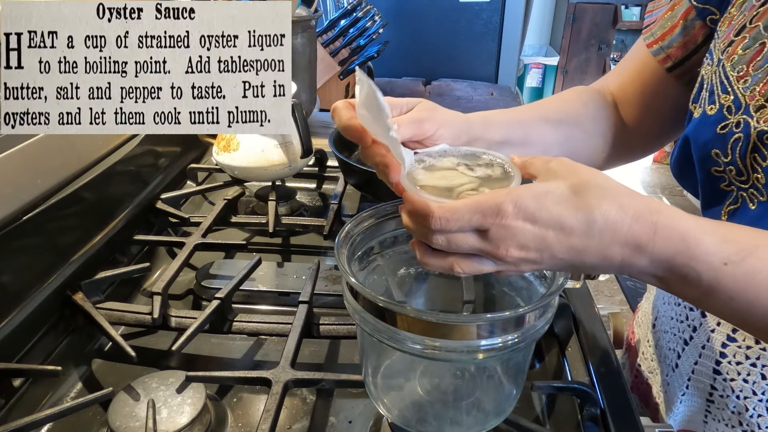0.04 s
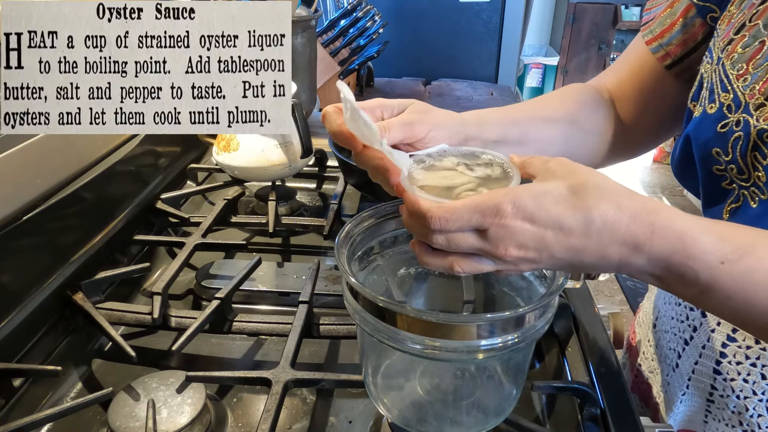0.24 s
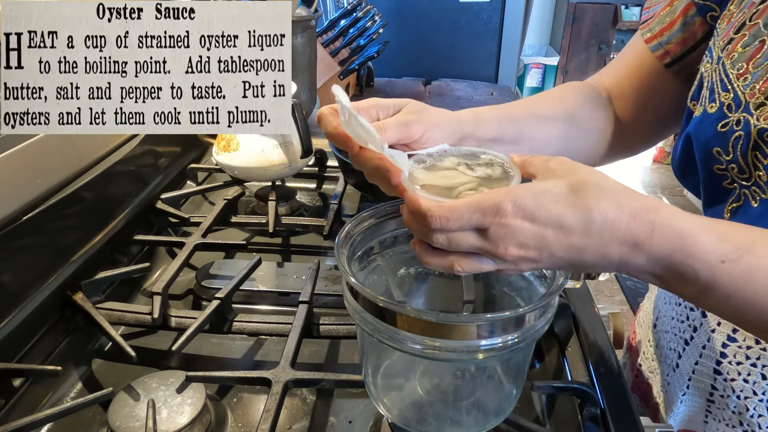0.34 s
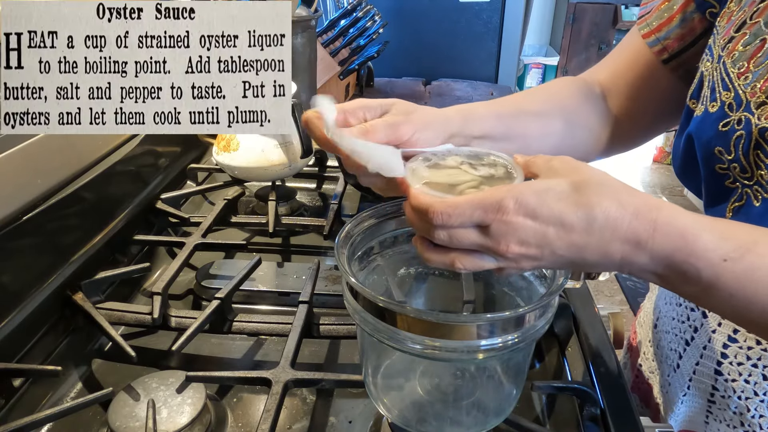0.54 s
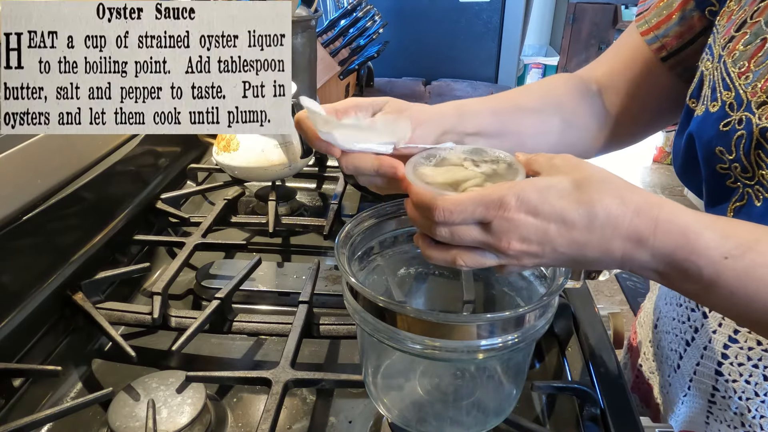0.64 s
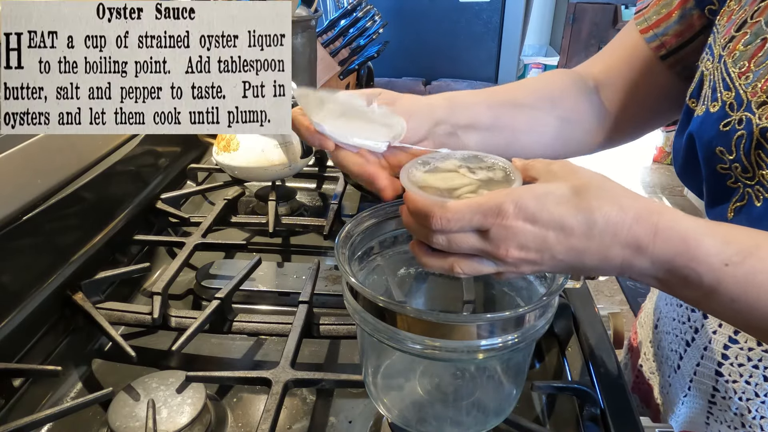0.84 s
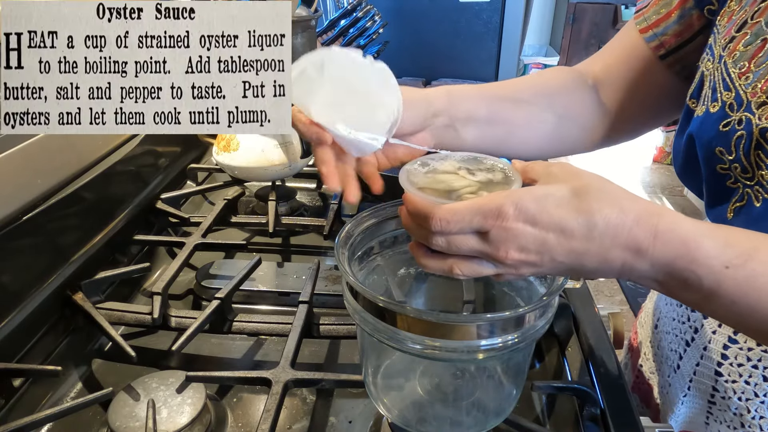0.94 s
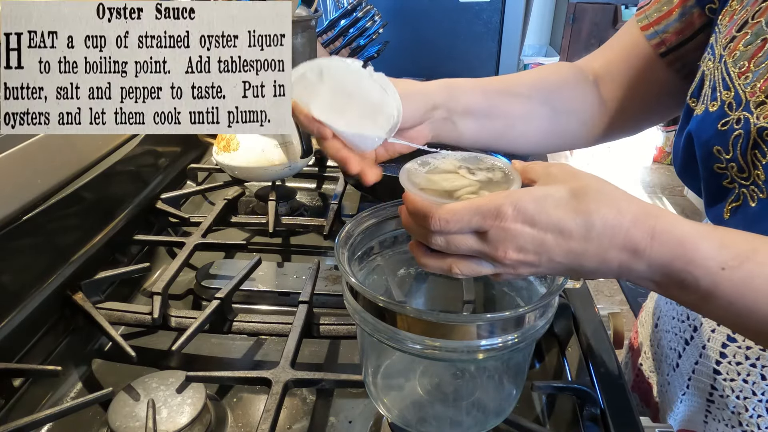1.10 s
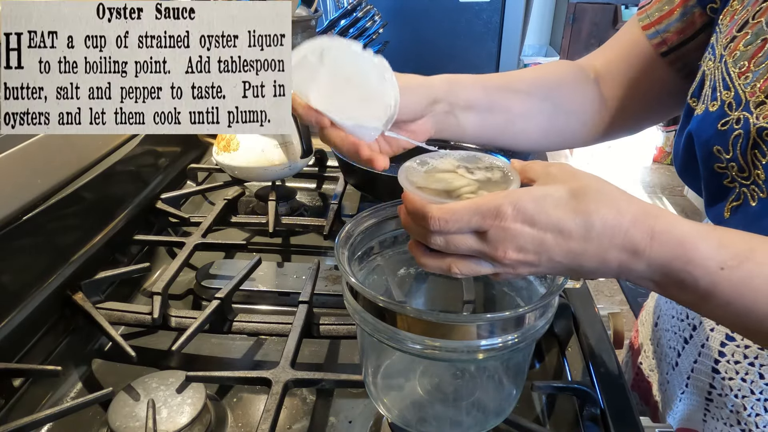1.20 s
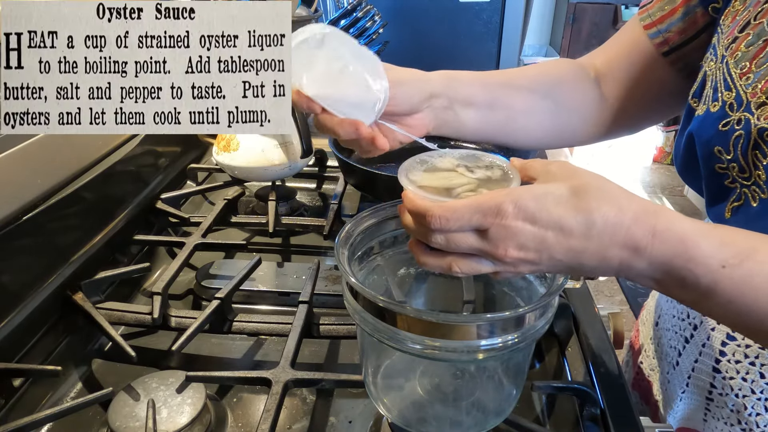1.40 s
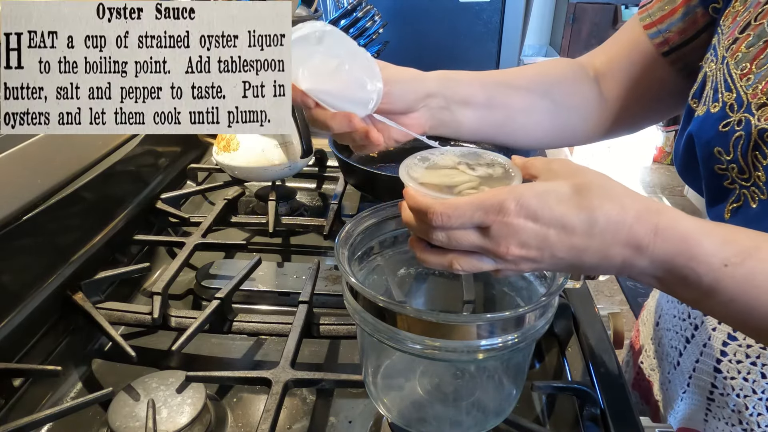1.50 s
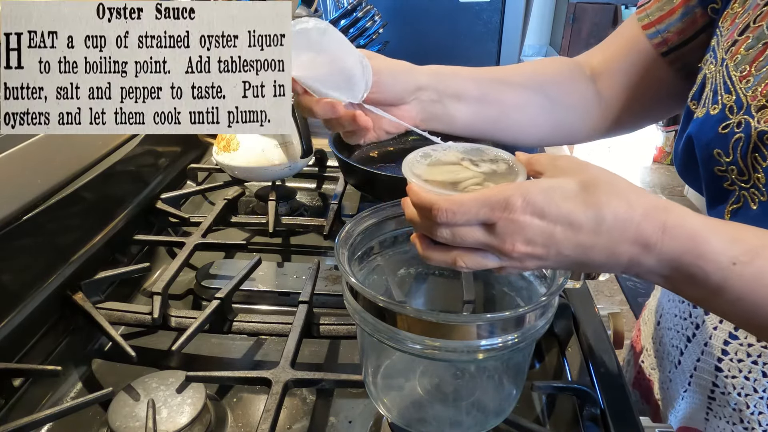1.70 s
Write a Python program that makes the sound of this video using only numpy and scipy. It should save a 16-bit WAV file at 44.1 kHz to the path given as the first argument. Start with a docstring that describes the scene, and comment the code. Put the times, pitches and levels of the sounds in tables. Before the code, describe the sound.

A thin plastic lid is peeled off a small tub: scattered crackles build to sharp, loud snaps and a brief hollow tub knock, then faint flexing ticks. Close stereo microphone in a quiet kitchen with faint hum.

```python
"""Sharp plastic snaps and fine crinkles are heard first: a thin lid is pried off a plastic tub in a kitchen.
Snaps are bursts of noise through resonances; crinkles are many tiny damped tones. Hard snaps knock the tub,
which rings briefly as a set of fading tones. The freed lid then ticks as it flexes in the fingers.
The room answers with fading noise tails. A low rumble, low swells, a mains hum and air noise lie under it."""
import sys
import numpy as np
from scipy import signal
from scipy.fft import rfft, irfft, next_fast_len
from scipy.io import wavfile
from scipy.ndimage import map_coordinates

SR = 44100
rng = np.random.default_rng(int(sys.argv[2]) if len(sys.argv) > 2 else 0)


def to_linear_factor(level_db):
    """Convert decibel levels (scalar or array-like) to linear amplitude factors."""
    exponent = np.asarray(level_db, float) / 20
    return 10 ** exponent


def unload_audio(sound):
    """Save the sound as a 16-bit wav file, at the path given as the first command line argument."""
    columns = np.transpose(np.atleast_2d(sound))
    # keep every value between -1 and 1, then stretch to whole-number steps
    steps = np.round(np.clip(columns, -1, 1) * 32767)
    wavfile.write(sys.argv[1], SR, steps.astype(np.int16))


N = 77175  # length in samples, 1.75 s
LID_FLOOR_HZ = 1020  # below this the thin lid gives little sound


def unit(x):
    """Scale to an rms (average strength) of 1 along the last axis."""
    return x / np.sqrt(np.mean(x ** 2, axis=-1, keepdims=True) + 1e-20)


def along(points, hz):
    """Read a curve of (Hz, value) points at any frequency, on a log axis."""
    point_hz, value = np.transpose(points)
    return np.interp(np.log(hz + 1), np.log(point_hz + 1), value)


def curves(rows):
    """One value per sample for each column after the time."""
    s, *columns = np.transpose(rows)
    return [np.interp(np.arange(N) / SR, s, column) for column in columns]


def wobble(rate):
    """A smooth random curve with rate random points a second."""
    points = rng.standard_normal(int(N * rate / SR) + 4)
    return map_coordinates(points, [np.arange(N) * rate / SR])


def filtered(x, response):
    """Shape a sound by a response that depends on frequency."""
    n = x.shape[-1]
    padded = next_fast_len(n + 8192)
    spectrum = rfft(x, padded) * response(np.fft.rfftfreq(padded, 1 / SR))
    return irfft(spectrum, padded)[..., :n]


def peak(f, hz, q):
    """A resonance at hz with gain 1 there; a higher q is narrower and rings longer."""
    damping = 1j * f * hz / q
    return damping / (hz * hz - f * f + damping)


def lid_floor(f):
    """Lose the lows, which the thin lid can hardly give off."""
    return (1j * f / (1j * f + LID_FLOOR_HZ)) ** 2


def placed(times, sounds):
    """Add up short sounds (rows), each at its own time."""
    starts = np.round(np.asarray(times) * SR).astype(int)[:, None]
    at = starts + np.arange(sounds.shape[1])
    return np.bincount(np.clip(at, 0, None).ravel(), sounds.ravel(), N + SR)[:N]


def pair(a, b, alike):
    """Left and right of a given likeness (0 to 1) from two unrelated sounds."""
    turn = np.arccos(np.clip(alike, 0, 1)) / 2
    shared, opposed = np.cos(turn) * a, np.sin(turn) * b
    return np.array([shared + opposed, shared - opposed])


def plastic_bursts(table, rise_s, crack_t60, rattle_t60, rattle_db, q, ring_db, broad_db):
    """Noise cracks and rattles through the panel's ring, broad crack, body and treble; t60 = s to fall 60 dB."""
    body_trim_db, treble_trim_db, treble_alike = 3.5, 4.5, 0.6
    strike = 4.2  # the first jerk that sets the panel ringing, over the crack's noise
    s, db, hz, body_db, treble_db = [column[:, None] for column in np.transpose(table)]
    t = np.arange(4096) / SR
    crack = to_linear_factor(-60 * t / crack_t60)
    rattle = to_linear_factor(rattle_db - 60 * t / rattle_t60)
    shape = (1 - np.exp(-t / rise_s)) * (crack + rattle)

    def ring_tone(f):
        return peak(f, hz, q) ** 2

    def broad_tone(f):
        return peak(f, 5000, 0.66) ** 2 / (1 + 1j * f / 8400) ** 2

    def body_tone(f):
        return peak(f, 1590, 0.85) ** 2 * lid_floor(f)

    def treble_tone(f):
        return peak(f, 10500, 1.23) ** 2

    tones = [ring_tone, broad_tone, body_tone, treble_tone, treble_tone]
    noise = rng.standard_normal((len(s), len(tones), len(t)))
    noise[:, 0, round(rise_s * SR) + 1] += strike
    parts = [filtered(shape * noise[:, k], tone) for k, tone in enumerate(tones)]
    parts = [part / np.abs(part).max(axis=1, keepdims=True) for part in parts]
    ring, broad, body, treble_a, treble_b = parts
    dull = to_linear_factor(ring_db) * ring + to_linear_factor(broad_db) * broad + to_linear_factor(body_db + body_trim_db) * body
    treble_gain = to_linear_factor(db + treble_db + treble_trim_db)
    trebles = [placed(s[:, 0], treble_gain * part) for part in (treble_a, treble_b)]
    return placed(s[:, 0], to_linear_factor(db) * dull), pair(*trebles, treble_alike)


# The lid's rim snaps free of the tub. Levels are nominal; the last two are relative to level_db, before their trims.
# Columns: start_s [s], level_db [dB], ring_hz [Hz], body_db [dB], treble_db [dB]
RIM_SNAPS = [(0.0004, -43.5, 4180, 0, -8), (0.0064, -30.5, 6600, -13.5, -10),
             (0.0278, -28.5, 6400, -12, -11), (0.0367, -35.5, 5630, -7, -30),
             (0.0618, -42.5, 2860, -2, -2.5), (0.1466, -41.5, 6400, -35, -10.5),
             (0.1693, -55, 6300, -38, -18), (0.1853, -49, 2630, -33, -15), (0.1976, -34, 5200, -28, -34),
             (0.2042, -27, 4740, -12, -14), (0.2205, -23.5, 6230, -15, -20), (0.335, -24, 5310, -24, -29),
             (0.3716, -21, 5460, -13.5, -33), (0.412, -42, 5670, -12, -7.5),
             (0.4474, -32, 4500, -15.5, -35), (0.4652, -21.5, 6570, -10.5, -43),
             (0.483, -52, 2440, -8, -37), (0.5226, -38, 4000, -27, -17), (0.5304, -35, 5770, -20, -15.5),
             (0.5757, -32, 5970, -17, -22), (0.5902, -48, 3280, -21.5, -9),
             (0.612, -35.5, 3020, -25, -11.5), (0.6268, -40, 3300, -26, -32.5),
             (0.6337, -37.5, 5930, -11, -39), (0.6523, -15.5, 2870, -16, -19.5),
             (0.6662, -17.5, 2820, -12.5, -15), (0.6713, -27.5, 2530, -4, -13.5),
             (0.7053, -10.5, 5690, -11, -34), (0.7131, -16.5, 3400, -5, -11.5)]


def rim_snaps():
    """The rim lets go in sudden jerks, each a short crack with a longer, weaker rattle."""
    return plastic_bursts(RIM_SNAPS, rise_s=0.00067, crack_t60=0.01, rattle_t60=0.069, rattle_db=-9.5,
                          q=3.1, ring_db=-4.5, broad_db=-5.5)


# The freed lid ticks as it flexes in the fingers. Levels work as for the snaps.
# Columns: start_s [s], level_db [dB], ring_hz [Hz], body_db [dB], treble_db [dB]
LID_TICKS = [(0.8846, -50.5, 5400, -20, -14), (0.916, -60, 3230, -28, -10),
             (0.9297, -51.5, 3400, -17, -8.5), (0.9331, -39.5, 7330, -36, -11),
             (0.9543, -52.5, 6000, -35, -12), (0.9614, -52, 3280, -27, -10),
             (0.9886, -40, 6400, -35, -12.5), (1.07, -36, 2920, -40, -29), (1.0866, -35, 5050, -36, -38),
             (1.1092, -49, 5370, -29, -27), (1.147, -72, 2340, -29, -23.5), (1.1748, -56, 4960, -16.5, -30),
             (1.2191, -43, 4900, -30.5, -27.5), (1.3089, -67, 5120, -19, -26),
             (1.3185, -53, 5170, -20, -24), (1.3669, -32.5, 2964, -29, -24.5),
             (1.4085, -49, 5730, -28, -19), (1.4241, -39.5, 5650, -38, -25),
             (1.4426, -39, 3200, -10.5, -17), (1.4583, -36.5, 2740, -19, -13),
             (1.479, -36.5, 5640, -26, -10), (1.4852, -35.5, 5450, -23, -20), (1.5033, -32, 2840, -30, -25),
             (1.5506, -32.5, 2860, -11, -35), (1.5618, -35.5, 2900, -27, -25),
             (1.571, -31.5, 2920, -15.5, -9.5), (1.6046, -43, 3040, -26, -28),
             (1.6327, -37.5, 2820, -41, -26), (1.6505, -30, 2750, -16.5, -32),
             (1.6641, -27.5, 2720, -27, -18), (1.6809, -30.5, 2700, -34, -23), (1.7085, -48, 2940, -29, -7),
             (1.723, -39, 2840, -11, -7.5), (1.7434, -42, 2810, -3, -19)]


def lid_ticks():
    """The flexing panel gives quicker bursts, with less rattle and a slightly sharper ring."""
    return plastic_bursts(LID_TICKS, rise_s=0.00044, crack_t60=0.0069, rattle_t60=0.059, rattle_db=-14,
                          q=3.58, ring_db=-3, broad_db=-6)


# Small creases in the plastic, as they change over time; level_db is before the trim.
# Columns: time_s [s], level_db [dB], pitch_hz [Hz] (the middle of a random spread)
CREASES = [(0, -48.5, 5000), (.05, -49, 5000), (.075, -49.5, 4500), (.1, -90, 4670), (.19, -49, 4800),
           (.24, -55, 4350), (.3, -63, 4500), (.44, -57, 4400), (.53, -55, 4400), (.56, -62, 4830),
           (.63, -50.5, 3830), (.72, -41.5, 3970), (.8, -61.5, 4520), (.9, -66, 5470), (.95, -60.5, 6030),
           (1.02, -65, 5940), (1.045, -61, 6040), (1.09, -57, 4720), (1.14, -85, 4690), (1.3, -74.5, 5420),
           (1.41, -63.5, 4440), (1.49, -56.5, 4000), (1.53, -54, 3500), (1.575, -59.5, 3600),
           (1.62, -60, 3340), (1.675, -54, 3340), (1.75, -52.5, 3580)]


def crinkle():
    """Many tiny creases, each a few damped cycles at a random pitch."""
    count, pitch_spread, size_db, trim_db = 2000, 0.487, 3, -5
    ring_cycles = 4.2  # each crease fades to about a third in half this many cycles
    level_db, pitch_hz = curves(CREASES)
    s = rng.random(count) * (N - 1) / SR
    hz = pitch_hz[(s * SR).astype(int)] * np.exp(pitch_spread * rng.standard_normal(count))
    hz = np.clip(hz, 600, 14000)[:, None]
    size = to_linear_factor(size_db * rng.exponential(size=count))[:, None]
    cycles = hz * np.arange(512) / SR
    grains = size * np.sin(2 * np.pi * cycles) * np.exp(-cycles * 2 / ring_cycles)
    return unit(filtered(placed(s, grains), lid_floor)) * to_linear_factor(level_db + trim_db)


# The hardest snaps jolt the tub; level_db is before the trim.
# Columns: start_s [s], level_db [dB], thump_share [0 to 1]
TUB_JOLTS = [(0.373, -42.5, 0.12), (0.668, -36, 0.1), (0.705, -25.5, 0.079), (0.713, -29, 0.09)]
# The tub's own ringing tones; levels vary a little at each jolt.
# Columns: pitch_hz [Hz], level_db [dB], t60_s [s to fall 60 dB]
TUB_TONES = [(535.5, 5, 0.044), (545.6, -1, .25), (686, 5.5, 0.054), (1235, -12, 0.19), (1510, -11, 0.2),
             (1730, -20, 0.17), (2150, -16, 0.28), (2655, -3.5, 0.13), (3337, -12, .1), (5430, -1, .09),
             (5650, -4.5, 0.062)]
# The low thump's tones, scaled by thump_share; levels vary likewise.
# Columns: pitch_hz [Hz], level_db [dB], t60_s [s to fall 60 dB]
THUMP_TONES = [(99.3, 16, 0.094), (234.4, 18.5, 0.068)]


def tub_knocks():
    """Every jolt rings the tub's tones anew, in a fresh balance, with its share of low thump."""
    trim_db, rise_s, vary_db = -5, 0.0019, 1.3
    s, db, thump_share = np.transpose(TUB_JOLTS)
    t = np.arange(SR // 3) / SR
    hz, level_db, t60 = [column[:, None] for column in np.vstack([TUB_TONES, THUMP_TONES]).T]
    vary = vary_db * rng.standard_normal((len(s), len(hz), 1))
    tones = to_linear_factor(level_db + vary - 60 * t / t60) * np.sin(2 * np.pi * hz * t)
    ring = tones[:, :len(TUB_TONES)].sum(axis=1)
    thump = tones[:, len(TUB_TONES):].sum(axis=1)
    sound = (ring + thump_share[:, None] * thump) * (1 - np.exp(-t / rise_s))
    return placed(s, to_linear_factor(db + trim_db)[:, None] * sound)


# How long the room's answer lasts.
# Columns: pitch_hz [Hz], t60_s [s to fall 60 dB]
ROOM_FADE = [(300, 0.38), (1500, 0.33), (5000, 0.21), (12000, 0.18)]


def room(x):
    """Each frequency of the kitchen's answer dies at its own speed; every stretch meets a new tail."""
    alike, delay = 0.33, 130  # left-right likeness; samples before the answer, about 3 ms
    out, stretch = np.zeros((2, N + SR)), SR // 8
    for at in range(0, N, stretch):
        hz, t, noise = signal.stft(rng.standard_normal((2, SR // 2)), SR, nperseg=256)
        fade = to_linear_factor(-60 * t / along(ROOM_FADE, hz)[:, None])
        a, b = signal.istft(noise * fade, SR, nperseg=256)[1]
        tail = pair(a, b, alike) / np.linalg.norm(a)
        wet = signal.fftconvolve(x[None, at:at + stretch], tail, axes=1)
        out[:, at + delay:][:, :wet.shape[1]] += wet
    return out[:, :N]


# How strong the deep rumble is over time.
# Columns: time_s [s], level_db [dB rms]
RUMBLE_LEVEL = [(0.0, -64), (0.048, -49.5), (0.174, -67), (0.218, -49.5), (0.414, -45), (0.642, -52),
                (0.872, -42.5), (0.97, -51.5), (1.086, -44), (1.418, -59.5), (1.612, -47.5), (1.656, -61),
                (1.714, -45), (1.75, -44)]


def rumble():
    """One deep tone whose pitch wanders at random."""
    hz, wander_hz = 29.5, 7.03
    t = np.arange(N) / SR
    drift = np.cumsum(wander_hz / 2 * wobble(4.3)) / SR
    tone = np.sin(2 * np.pi * (hz * t + drift + rng.random()))
    return unit(tone) * to_linear_factor(curves(RUMBLE_LEVEL)[0])


# How strong the low swells are over time.
# Columns: time_s [s], level_db [dB rms]
SWELL_LEVEL = [(0.0, -55.5), (0.268, -55), (0.37, -62), (0.526, -49), (0.618, -62), (0.676, -56),
               (0.72, -47), (0.76, -52), (0.832, -62.5), (1.126, -54), (1.256, -67.5), (1.33, -53),
               (1.51, -62.5), (1.54, -51), (1.588, -68.5), (1.75, -54)]


def swells():
    """Noise through a low resonance, nearly alike left and right, rising and falling."""
    noise = filtered(rng.standard_normal((2, N)), lambda f: peak(f, 70.4, 1) ** 2)
    return unit(pair(*noise, 0.95)) * to_linear_factor(curves(SWELL_LEVEL)[0])


# The mains hum's tones; their levels waver around these values.
# Columns: pitch_hz [Hz], level_db [dB rms]
HUM_TONES = [(119.5, -73.5), (240.5, -61)]


def mains_hum():
    """Steady-pitched tones whose loudness wavers smoothly at random."""
    waver_db = 1
    t = np.arange(N) / SR
    hum = np.zeros(N)
    for hz, db in HUM_TONES:
        tone = unit(np.sin(2 * np.pi * (hz * t + rng.random())))
        hum += tone * to_linear_factor(db + waver_db * wobble(13.57))
    return hum


# The tone colour of the air noise; only relative levels matter.
# Columns: pitch_hz [Hz], level_db [dB per Hz, relative]
AIR_COLOUR = [(45, -120), (60, -9.5), (100, -19.5), (249, -7.5), (326, -11), (506, -20.5), (600, -29),
              (800, -33), (1130, -27.5), (2190, -40.5), (5500, -37.5), (9000, -45), (15500, -49.5)]
# How alike the air noise is on the two sides.
# Columns: pitch_hz [Hz], likeness [0 to 1]
AIR_LIKENESS = [(60, 0.84), (200, 0.44), (700, 0.17), (3000, .3)]


def air_noise():
    """Steady noise, coloured by frequency and spread between left and right."""
    def mid_and_side(hz):
        turn = np.arccos(np.clip(along(AIR_LIKENESS, hz), 0, 1)) / 2
        return to_linear_factor(along(AIR_COLOUR, hz)) * [np.cos(turn), np.sin(turn)]

    mid, side = filtered(rng.standard_normal((2, N)), mid_and_side)
    return to_linear_factor(-61.5) * unit(np.array([mid + side, mid - side]))


def scene():
    """The lid a little to the left, its treble more so; the left side hears it a moment later."""
    pan_db, treble_pan_db = 1, 8.5  # how much louder on the left than on the right
    room_db, tub_room_db, lag_s = -8, -4.5, 0.8 / SR
    snap_dull, snap_treble = rim_snaps()
    tick_dull, tick_treble = lid_ticks()
    plastic = snap_dull + tick_dull + crinkle()
    treble = snap_treble + tick_treble
    knocks = tub_knocks()
    sides = np.array([[.5], [-.5]])
    direct = (plastic + knocks) * to_linear_factor(pan_db * sides) + treble * to_linear_factor(treble_pan_db * sides)
    # delay the left side only
    direct = filtered(direct, lambda hz: np.exp(-1j * 2 * np.pi * hz * lag_s * (sides + .5)))
    answer = to_linear_factor(room_db) * room(plastic + treble[0] + to_linear_factor(tub_room_db) * knocks)
    return direct + answer + rumble() + swells() + mains_hum() + air_noise()


def top_cut(x):
    """Nothing passes above the cut-off."""
    return signal.sosfilt(signal.butter(12, 15710, fs=SR, output="sos"), x)


# The microphone's falling treble.
# Columns: pitch_hz [Hz], gain_db [dB]
MIC_TREBLE = [(8000, -0.5), (12000, -2), (14000, -7.5), (15500, -20)]


def record(dry):
    """The microphone weakens the treble, and nothing passes from 15750 Hz up."""
    mix = filtered(dry, lambda hz: to_linear_factor(along(MIC_TREBLE, hz)) * (hz < 15750))
    return top_cut(mix)


dry = scene()
out = record(dry)
unload_audio(out)
```